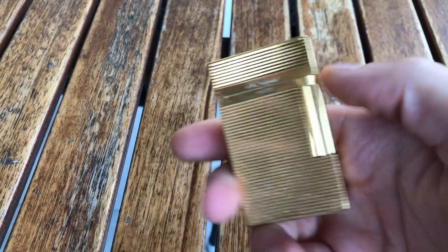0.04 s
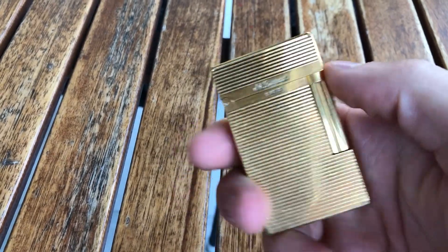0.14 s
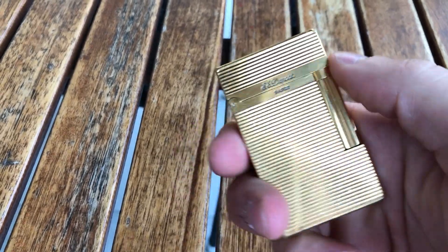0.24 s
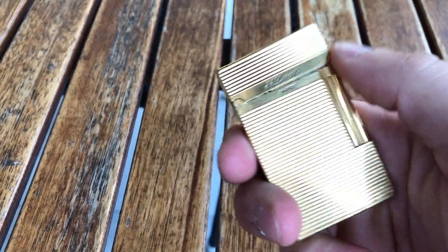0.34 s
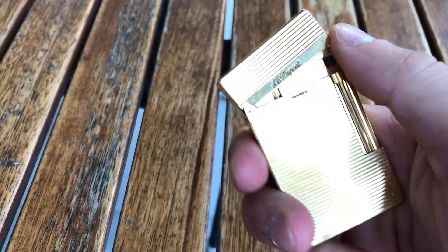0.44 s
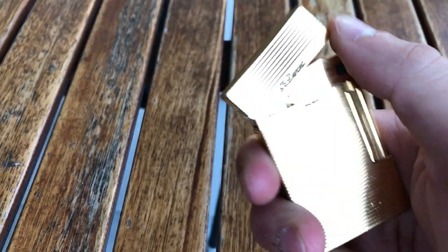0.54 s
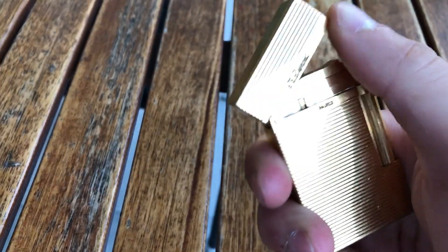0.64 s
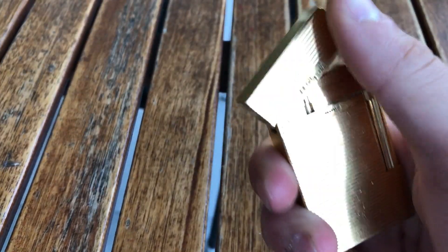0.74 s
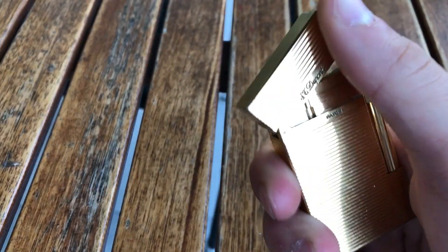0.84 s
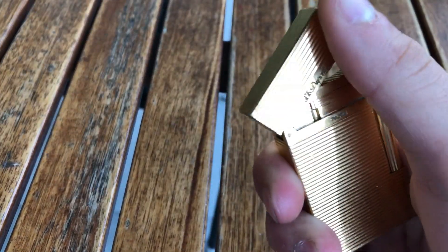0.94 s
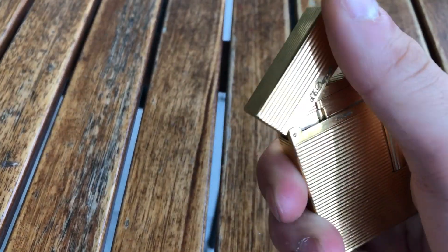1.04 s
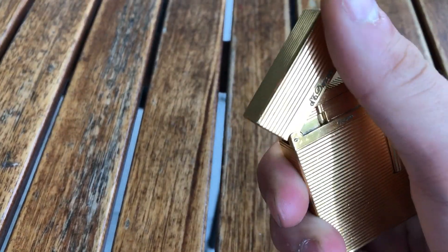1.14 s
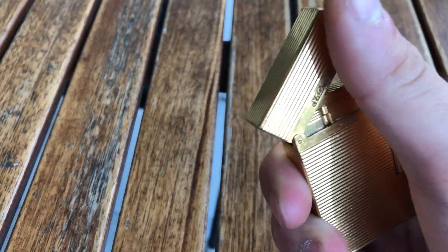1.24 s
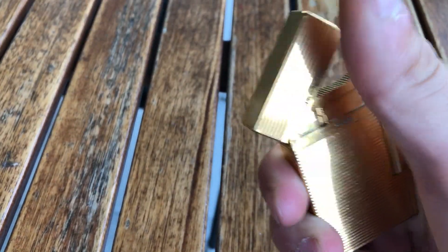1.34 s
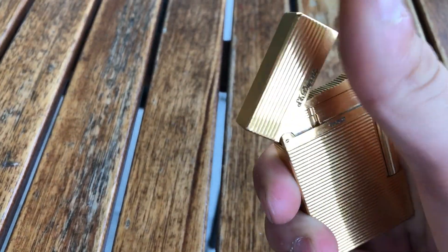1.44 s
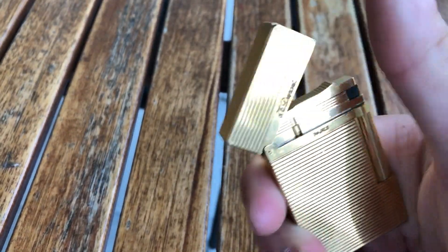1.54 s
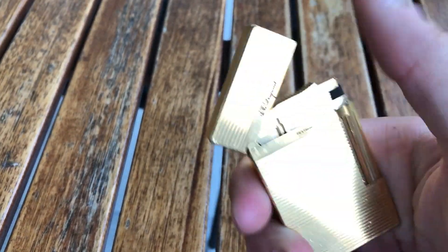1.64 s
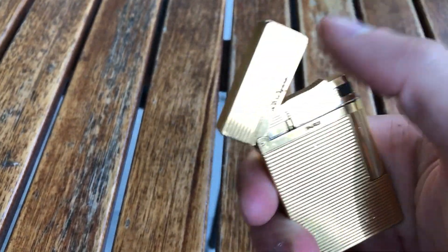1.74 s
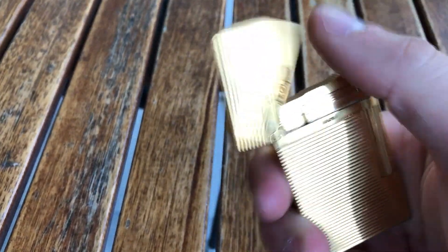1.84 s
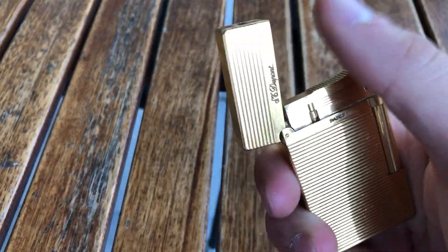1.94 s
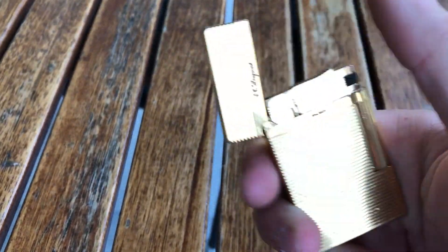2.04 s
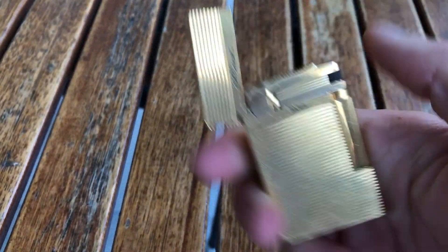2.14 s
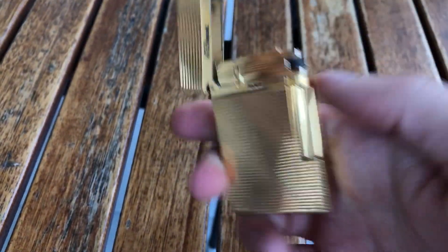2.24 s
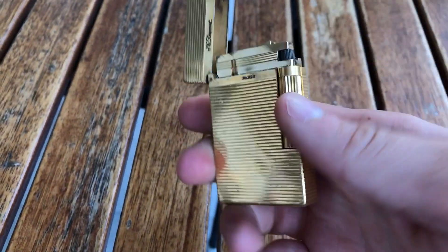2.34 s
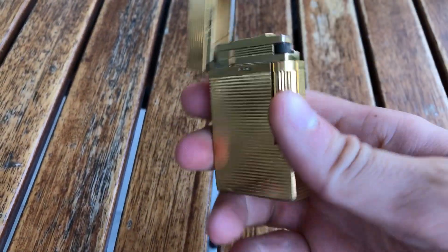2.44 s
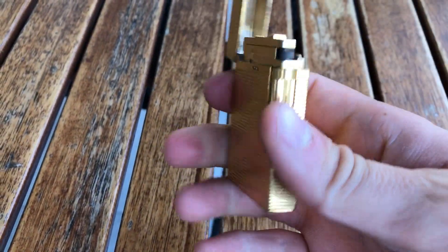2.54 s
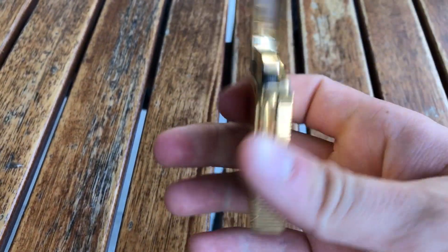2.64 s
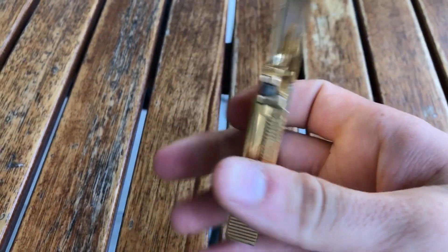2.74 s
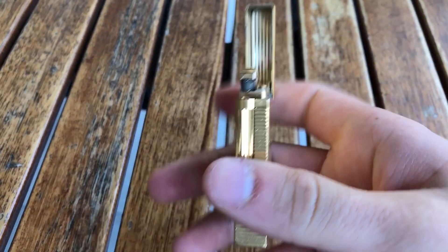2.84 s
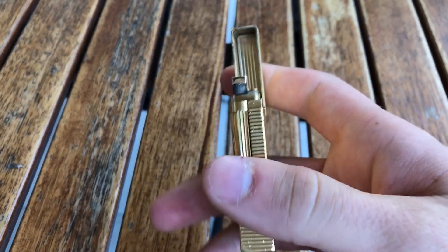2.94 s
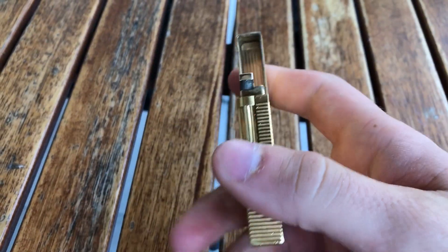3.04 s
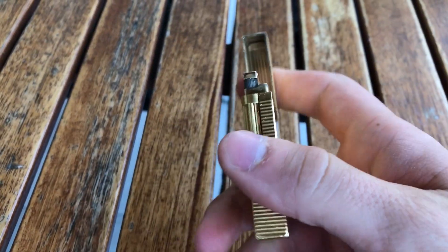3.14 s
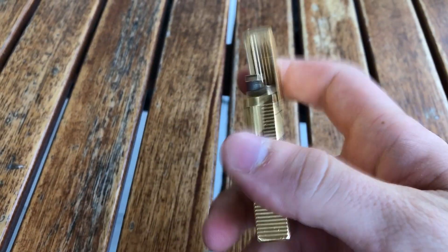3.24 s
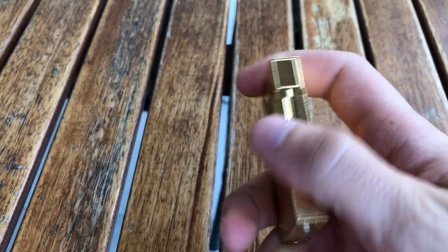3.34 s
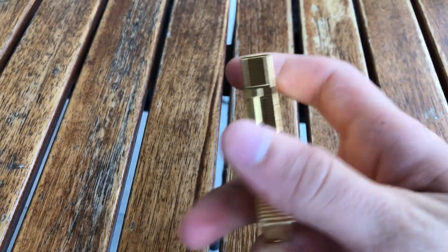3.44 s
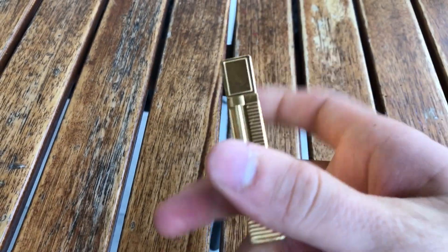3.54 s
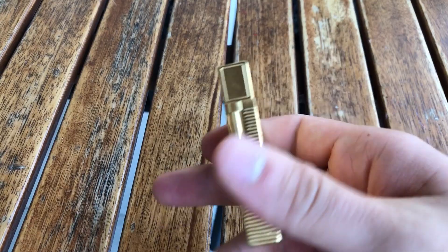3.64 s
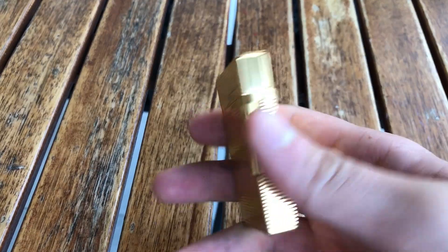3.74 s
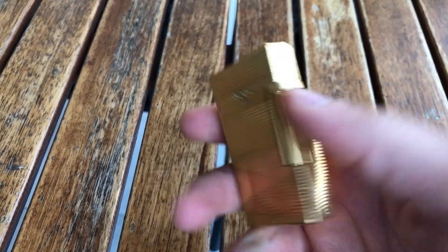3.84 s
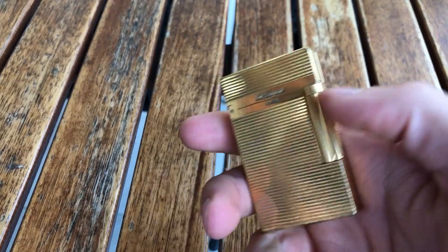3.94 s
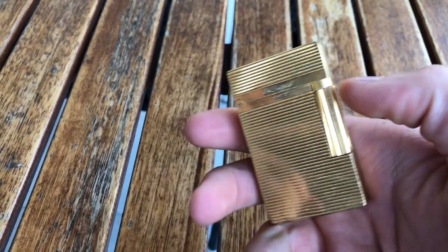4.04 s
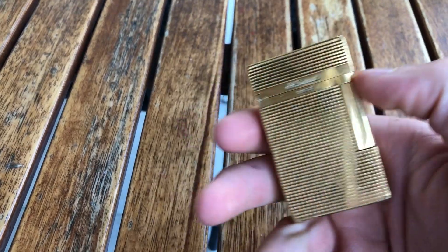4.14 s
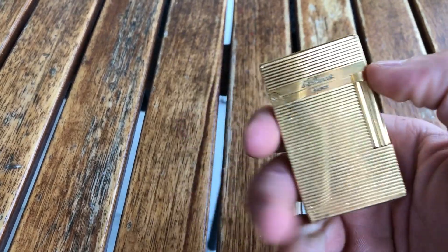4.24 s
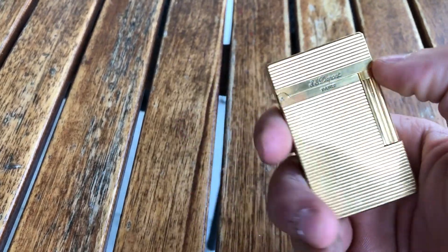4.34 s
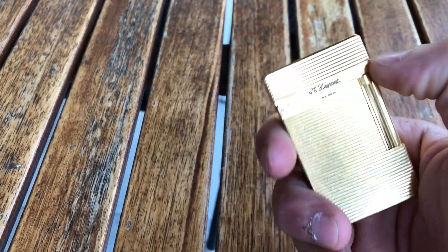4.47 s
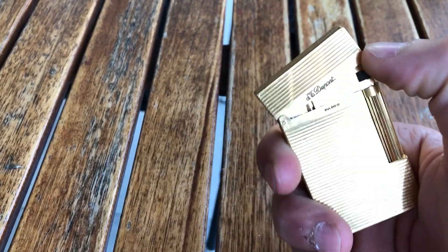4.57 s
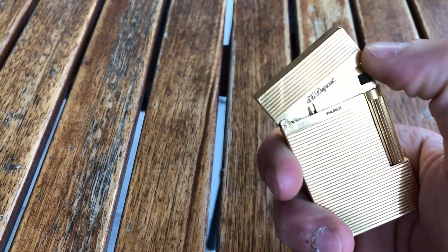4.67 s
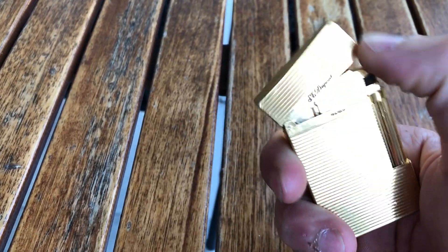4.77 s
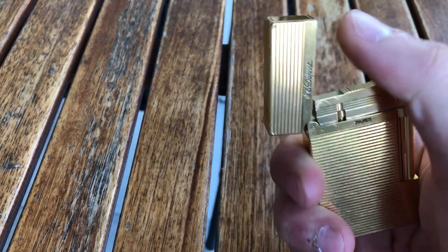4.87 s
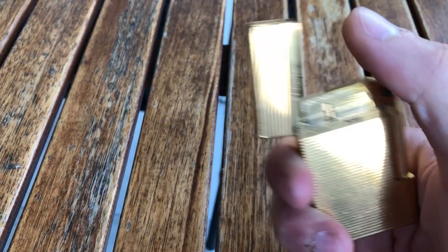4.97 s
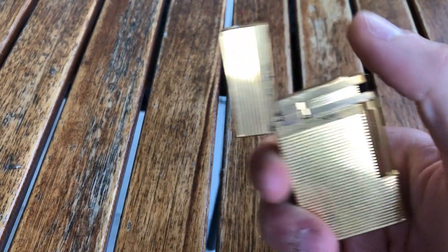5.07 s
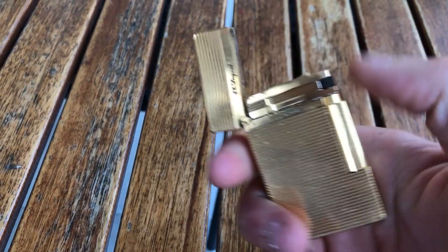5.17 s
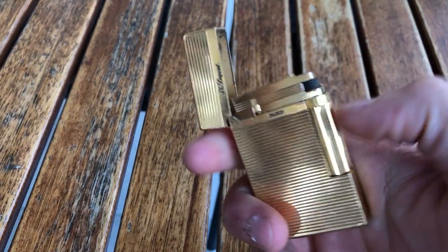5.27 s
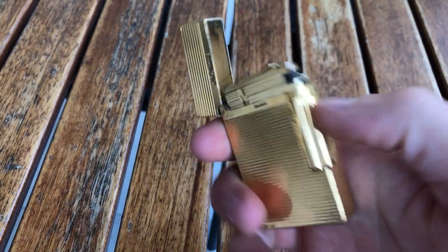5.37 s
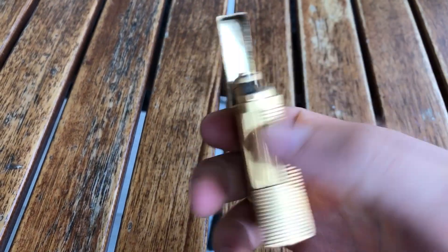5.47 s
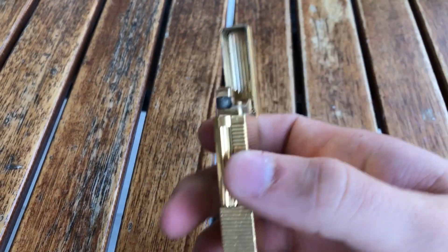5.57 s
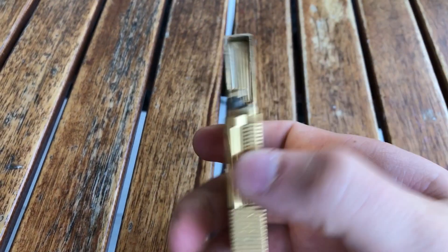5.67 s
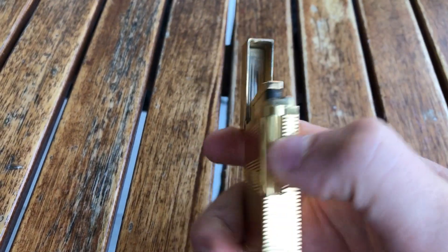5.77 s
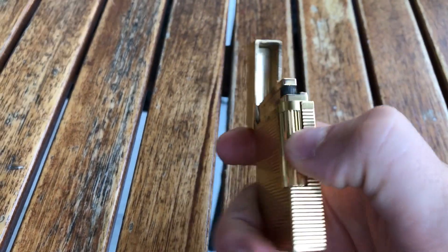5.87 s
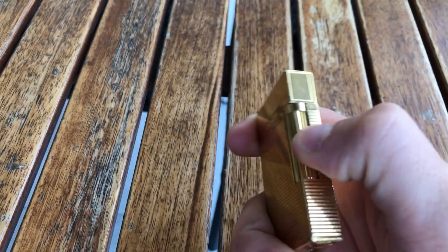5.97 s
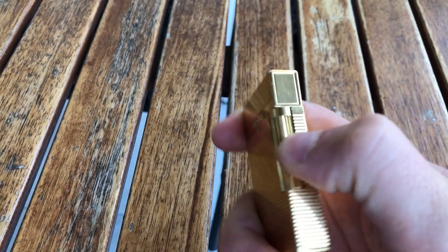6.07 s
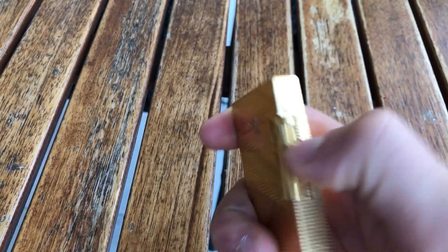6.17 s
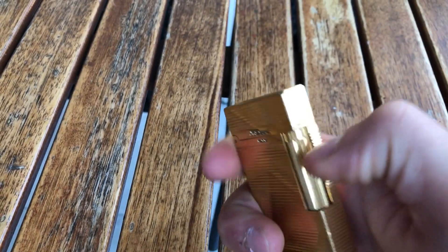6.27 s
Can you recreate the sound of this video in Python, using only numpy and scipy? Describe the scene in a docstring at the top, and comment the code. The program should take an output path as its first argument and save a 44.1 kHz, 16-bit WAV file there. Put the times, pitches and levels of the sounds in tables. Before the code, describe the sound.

Close metallic flicks: light thumb ticks, a bright high ping slowly fading, a hard crisp snap closed, repeated once, with distant traffic behind.

```python
"""Outdoors, near walls, far traffic humming: a brass pocket lighter handled close to a phone.
The thumb knocks and rubs the lid, the spring throws it open twice with a long ping (decaying sine modes plus
noise cracks), and each time it is snapped shut (grinding noise bursts, case modes, low puffs and thumps).
Walls answer with decaying noise echoes; traffic is slowly swelling coloured noise.
A limiter ducks everything when the treble is loud and creeps back."""
import sys
import numpy as np
from scipy import signal
from scipy.fft import rfft, irfft, next_fast_len
from scipy.io import wavfile
from scipy.ndimage import uniform_filter1d, minimum_filter1d, map_coordinates

SR = 44100
rng = np.random.default_rng(int(sys.argv[2]) if len(sys.argv) > 2 else 0)


def digitize_waveform(pressure):
    """Quantize a signal to 16-bit integers and store it at the path in sys.argv[1].

    Rows of a 2-D input are taken as channels; values are limited to [-1, 1].
    """
    field = np.atleast_2d(pressure).T
    bounded = np.clip(field, -1, 1)
    quanta = np.round(bounded * 32767).astype(np.int16)
    wavfile.write(sys.argv[1], SR, quanta)


N = 278271

# far traffic: (time [s], rumble level [dB], tyre rush level [dB])
TRAFFIC = [(0, -50, -58), (.7, -50, -59), (1.401, -50.5, -57), (1.999, -48, -59), (2.5, -50, -58.5),
           (2.9, -49, -55), (3.3, -51, -56), (3.8, -51, -59.5), (4.4, -48.5, -57), (5, -50, -62),
           (5.6, -49.5, -61), (6.31, -51, -59.5)]
# noise spectra, relative: (frequency [Hz], density [dB per Hz])
RUMBLE_SPECTRUM = [(12, -51.5), (20, -32.5), (45, -7), (65, 2.5), (103, -1), (252, 0), (290, -4.5),
                   (352, -8), (515, -19), (900, -34), (1170, -43), (1980, -120)]
TYRE_SPECTRUM = [(290, -30), (500, -3), (597, -2), (704, -1.5), (938, 1), (1540, -5), (1860, -3),
                 (2990, -14.5), (7000, -30.5), (9100, -55.5), (15400, -120)]
HISS_SPECTRUM = [(2350, -28), (4000, -7.5), (8320, -9.5), (15100, -14.5), (16000, -24), (16600, -51.5)]
# decay of the walls' answer: (frequency [Hz], t60 [s])
WALL_DECAY = [(300, .2), (2000, .3), (4000, .4), (6500, .34), (10000, .3), (16000, .24)]
# microphone response: (frequency [Hz], gain [dB])
MICROPHONE = [(25, -9.5), (45, 0), (15700, -0.5), (16100, -10.5), (16600, -23)]
TOP_HZ = 16700  # band limit

# skin sliding on ribbed metal: (start [s], length [s], peak of the rms envelope [dB])
RUBS = [(.01, 0.05, -65), (0.148, .0097, -72), (0.38, .097, -72), (2.179, 0.063, -83.5),
        (2.333, 0.051, -63.5), (2.879, .05, -80), (4.568, .063, -68), (5.434, 0.088, -74),
        (6.252, .01, -60.5)]
# skin noise spectrum, relative: (frequency [Hz], density [dB per Hz])
SKIN_SPECTRUM = [(2000, -34.5), (6000, -11.5), (10000, -7), (15000, -1), (17000, -15)]

# lid snaps onto case: (time [s], burst level [dB], contact [s], t60 [s],
# main (3820 Hz) case mode offset [dB], puff offset [dB])
SNAPS = [(3.3287, 2, 0.0011, 0.015, -3.5, -7), (6.0055, 3, 0.0021, 0.011, 8.5, -8)]
# snap noise spectrum, relative: (frequency [Hz], density [dB per Hz])
SNAP_SPECTRUM = [(300, -40), (900, -18.5), (1600, -16), (2600, -12), (4000, -8.5), (5000, -9.5),
                 (7000, -4.5), (10700, -6.5), (15000, -12.5), (17000, -9)]
# modes of the shut case, main mode first: (frequency [Hz], relative level [dB], t60 [s])
CASE_MODES = [(3820, 0, .012), (2550, -6, .008), (5880, -17, .07), (7500, -3, .01), (9300, -6, .008),
              (12750, 6, .009), (15100, 10, .009)]
SNAP_RISE_S, SNAP_RING_DB = 0.00032, -3.5
# air squeezed from under the closing lid: (delay after snap [s], relative level [dB], frequency [Hz], t60 [s])
PUFFS = [(-.009, -27, 310, .03), (.0006, 1, 502.4, .013)]
# jolt thumping in the hand: (time [s], level [dB], t60 [s])
THUMPS = [(3.340, -26.5, .1), (6.022, -9.5, 0.026)]
THUMP_HZ = 72
# cam touches: (lead before the snap [s], ...)
CAM_LEAD_S = (.0235, .0118, .0060)
# cam touches: (level relative to the snap [dB], ...)
CAM_REL_DB = (-41.5, -43, -33)
# cam touches: (length of contact [s], ...)
CAM_CONTACT_S = (.0035, 0.0029, .005)
CAM_RISE_S, CAM_T60_S, CAM_RING_DB = 0.00053, 0.0069, -1.5

# modes of the lid, plus a faint tone at three times the first mode's pitch: (frequency [Hz], relative level
# [dB], t60 swinging free [s])
LID_MODES = [(3677.5, 0, .55), (3880, -30, .15), (2850, -28, .03), (4813, -25, .06), (5885, -22, .05),
             (6480, -36, .1), (7428, -22, .085), (9140, -34, .1), (11040, -53, .2), (12800, -42, .04),
             (15150, -42, .06)]
# crack noise spectrum, relative: (frequency [Hz], density [dB per Hz])
CRACK_SPECTRUM = [(1000, -44.5), (2000, -18.5), (3000, -1.5), (4200, 0), (6000, -11), (9000, -7),
                  (13000, -15), (16000, -17)]
# thumb knocks on the held lid: (time [s], ring level [dB], crack level [dB], longest t60 under the thumb [s],
# ring tilt [dB per octave], crack tilt [dB per octave])
TICKS = [(.407, -52, -66, .08, 6, 6), (.438, -54.5, -59, 0.12, 0, 6), (.4425, -71, -52, .15, 55, 0),
         (.554, -60, -52, .05, 0, 12), (.567, -51, -45.5, 0.04, 21, -1.5), (0.772, -61.5, -74, .25, 2, 4),
         (1.375, -67, -78, 0.27, 6, 0), (4.555, -46, -68.5, .05, 1.5, 6.5), (4.606, -39.5, -51, .09, 9, 7),
         (4.615, -74, -40.5, .15, 40, -10), (4.757, -72, -59, .05, 0, 7), (4.874, -55, -60, 0.11, 28, 3)]
TICK_CRACK_T60_S = .014
# spring throws the lid against its stop: (time [s], ring level [dB], crack level [dB],
# longest t60 the grip allows [s], ring tilt [dB per octave])
FLICKS = [(1.9178, -5, -11, 2, 0.5), (4.9114, -2.5, -9.5, 0.5, -7.5)]
FLICK_CRACK_T60_S, FLICK_CRACK_TILT_DB_PER_OCT = 0.013, -2
# second, weaker contact after each throw: longer crack, upper modes favoured; levels and tilt add to the throw's
BOUNCE_DELAY_S, BOUNCE_CRACK_T60_S = .0074, 0.035
BOUNCE_RING_DB, BOUNCE_CRACK_DB, BOUNCE_TILT_DB_PER_OCT = -28, -15, 22
TILT_LIMIT_OCT = .68  # ring tilt stops growing this far above the first mode


def amp(db):
    """Gain of a level in dB."""
    return 10 ** (np.asarray(db) / 20)


def unit(x):
    """x at rms 1."""
    return x / np.sqrt(np.mean(x ** 2) + 1e-20)


def along(points, hz):
    """Interpolate (frequency [Hz], value) points on a log frequency axis."""
    point_hz, values = np.transpose(points)
    return np.interp(np.log(hz + 1), np.log(point_hz + 1), values)


def filtered(x, response):
    """x through a zero-phase response of frequency."""
    size = next_fast_len(len(x) + 8192)
    spectrum = rfft(x, size) * response(np.fft.rfftfreq(size, 1 / SR))
    return irfft(spectrum, size)[:len(x)]


def without_bass(x, corner_hz):
    """x with the bass rolled off below corner_hz."""
    return filtered(x, lambda hz: 1 / (1 + (corner_hz / (hz + 1)) ** 4))


def noise(spectrum, size):
    """Coloured noise of rms 1."""
    return unit(filtered(rng.standard_normal(size), lambda hz: amp(along(spectrum, hz))))


def wobble(rate_hz):
    """Smooth random curve, rate_hz knots a second."""
    knots = rng.standard_normal(int(N * rate_hz / SR) + 4)
    return map_coordinates(knots, [np.arange(N) * rate_hz / SR])


def add(track, time_s, sound):
    """Mix a sound into the track at time_s."""
    part = track[round(time_s * SR):][:len(sound)]
    part += sound[:len(part)]


def street():
    """Rumble and tyre rush, noise swelling slowly, under a thin steady hiss."""
    time_s, rumble_db, tyre_db = np.transpose(TRAFFIC)
    t = np.arange(N) / SR
    rumble_gain = amp(np.interp(t, time_s, rumble_db) + .8 * wobble(3.8))
    rumble = rumble_gain * noise(RUMBLE_SPECTRUM, size=N)
    tyre_gain = amp(np.interp(t, time_s, tyre_db) + .6 * wobble(2.5))
    tyres = tyre_gain * noise(TYRE_SPECTRUM, size=N)
    return rumble + tyres + amp(-78.5) * noise(HISS_SPECTRUM, size=N)


def walls(x, first_db, swell_db, gap_s=.0145, first_s=.0165):
    """After a gap, a dense first group of echoes, then a tail dying band by band."""
    hz, t, bands = signal.stft(rng.standard_normal(SR // 2), SR, nperseg=256)
    decay = amp(-60 * t / along(WALL_DECAY, hz)[:, None])
    tail = signal.istft(bands * decay, SR, nperseg=256)[1]
    u = np.arange(len(tail)) / SR
    # the first group's boost ramps by swell_db, then fades out around first_s
    ramp_db = first_db + swell_db * (u / first_s - 1)
    group_db = ramp_db / (1 + np.exp(np.clip((u - first_s) / .0015, -50, 50)))
    tail = tail * amp(group_db) * (1 - np.exp(-u / 0.0015))
    tail = np.pad(tail / np.linalg.norm(tail), (round(gap_s * SR), 0))  # unit energy
    return signal.fftconvolve(x, tail)[:N]


def rubs():
    """Thin grainy hiss while skin slips over the ribs."""
    shape = np.zeros(N)
    for time_s, length_s, db in RUBS:
        add(shape, time_s, amp(db) * np.hanning(round(length_s * SR)) ** .5)
    grain = amp(2.6 * wobble(100))
    return shape * unit(grain * noise(SKIN_SPECTRUM, size=N))


def puffs():
    """Decaying low sines: air pushed out at each snap, and thumps in the hand."""
    out, t = np.zeros(N), np.arange(8192) / SR
    pushes = []
    for snap_s, *_, puff_db in SNAPS:
        pushes += [(snap_s + delay_s, puff_db + db, hz, t60_s) for delay_s, db, hz, t60_s in PUFFS]
    pushes += [(time_s, db, THUMP_HZ, t60_s) for time_s, db, t60_s in THUMPS]
    for time_s, db, hz, t60_s in pushes:
        add(out, time_s, amp(db - 60 * t / t60_s) * np.sin(2 * np.pi * hz * t))
    return out


def contacts():
    """Cam touches, then the snap: (time, level, rise, contact, t60, ring dB, main mode dB)."""
    rows = []
    for time_s, db, contact_s, t60_s, main_db, _ in SNAPS:
        for lead_s, rel_db, touch_s in zip(CAM_LEAD_S, CAM_REL_DB, CAM_CONTACT_S):
            rows.append((time_s - lead_s, db + rel_db, CAM_RISE_S, touch_s, CAM_T60_S, CAM_RING_DB, main_db))
        rows.append((time_s, db, SNAP_RISE_S, contact_s, t60_s, SNAP_RING_DB, main_db))
    return rows


def shutting():
    """Each contact is a burst of bright grinding noise that also rings the shut case.
    Summed over all directions, as the walls receive it, a burst is one smooth pulse of the same energy."""
    bursts, ring, pulses = np.zeros(N), np.zeros(N), np.zeros(N)
    t = np.arange(4096) / SR
    impulse = np.eye(1, 4096, 64)[0]
    pulse = filtered(impulse, lambda hz: amp(along(SNAP_SPECTRUM, hz)))
    for time_s, db, rise_s, contact_s, t60_s, ring_db, main_db in contacts():
        start = amp(db) * (1 - np.exp(-t / rise_s))
        after_s = np.maximum(t - contact_s, 0)
        shape = start * amp(-60 * after_s / t60_s)  # holds during contact, then decays
        add(bursts, time_s, shape * noise(SNAP_SPECTRUM, size=4096))
        add(pulses, time_s, pulse * np.linalg.norm(shape) / np.linalg.norm(pulse))
        for k, (hz, mode_db, mode_t60_s) in enumerate(CASE_MODES):
            level_db = mode_db + ring_db + rng.normal(0, 1.7) + (main_db if k == 0 else 0)
            tone = np.sin(2 * np.pi * (hz * t + rng.random()))
            add(ring, time_s, start * amp(level_db - 60 * t / mode_t60_s) * tone)
    return bursts, ring, pulses


def blows():
    """Blows on the lid: (time, ring dB, crack dB, crack t60, grip t60, ring tilt, crack tilt)."""
    rows = [(time_s, ring_db, crack_db, TICK_CRACK_T60_S, *rest) for time_s, ring_db, crack_db, *rest in TICKS]
    for time_s, ring_db, crack_db, grip_s, tilt in FLICKS:
        rows.append((time_s, ring_db, crack_db, FLICK_CRACK_T60_S, grip_s, tilt, FLICK_CRACK_TILT_DB_PER_OCT))
        rows.append((time_s + BOUNCE_DELAY_S, ring_db + BOUNCE_RING_DB, crack_db + BOUNCE_CRACK_DB,
                     BOUNCE_CRACK_T60_S, grip_s, tilt + BOUNCE_TILT_DB_PER_OCT, FLICK_CRACK_TILT_DB_PER_OCT))
    return rows


def lid(rebound_s=.0115, turn_s=.0045, dip_db=-3):
    """Each blow rings the lid's modes and cracks; a gripping thumb shortens the ring."""
    ring, cracks = np.zeros(N), np.zeros(N)
    t = np.arange(SR) / SR
    short = t[:2048]
    # fast build-up, then a dip while the lid rebounds from its stop
    dip = amp(dip_db * np.exp(-((t - rebound_s) / turn_s) ** 2))
    swing = (1 - np.exp(-t / .0004)) * dip
    for time_s, ring_db, crack_db, crack_t60_s, grip_s, ring_tilt, crack_tilt in blows():
        for hz, mode_db, t60_s in LID_MODES:
            octaves = min(np.log2(hz / LID_MODES[0][0]), TILT_LIMIT_OCT)
            level_db = ring_db + mode_db + ring_tilt * octaves
            decay = amp(level_db - 60 * t / min(t60_s, grip_s))
            add(ring, time_s, swing * decay * np.sin(2 * np.pi * hz * t))
        shape = amp(crack_db - 60 * short / crack_t60_s) * (1 - np.exp(-short / 0.00036))
        tilted = [(hz, db + crack_tilt * np.log2(hz / 4000)) for hz, db in CRACK_SPECTRUM]
        add(cracks, time_s, shape * noise(tilted, size=2048))
    # so small a lid radiates little bass
    return without_bass(ring, 1800), without_bass(cracks, 1800)


def scene():
    """The lighter close by, its echoes, and the street."""
    ring, cracks = lid()
    bursts, case, pulses = shutting()
    sent = without_bass(pulses + amp(2.0) * case, 2200)
    early = np.arange(N) < N * 3 // 4  # the hand moves, so the two snaps meet different echoes
    echoes = amp(-11.5) * walls(sent * early, first_db=12.0, swell_db=8)
    echoes += amp(-12.5) * walls(sent * ~early, first_db=7, swell_db=2.0)
    echoes += walls(amp(-24) * cracks + amp(-27.5) * ring, first_db=6.5, swell_db=-2.8)
    return (ring + cracks + bursts + case + puffs() + rubs() + echoes + street())[None]


def limiter(x, sense_hz=6000, ceiling_db=-17, stages=((.03, .15), (.5, .4), (5, .45))):
    """Treble over the ceiling turns the whole sound down just ahead of time.
    The gain returns in stages: (time constant [s], share)."""
    treble = filtered(x, lambda hz: hz > sense_hz)
    level_db = 10 * np.log10(np.abs(uniform_filter1d(treble ** 2, size=64)) + 1e-12)
    log_excess = np.log(np.maximum(level_db - ceiling_db, 1e-3))
    wanted = -minimum_filter1d(-log_excess, size=33)  # moving maximum looks ahead
    t = np.arange(N) / SR
    cut_db = np.zeros(N)
    for tau_s, share in stages:
        # peak hold whose cut in dB decays exponentially
        cut_db += share * np.exp(np.maximum.accumulate(wanted + t / tau_s) - t / tau_s)
    cut_db = cut_db / sum(share for _, share in stages)
    return x * amp(-uniform_filter1d(cut_db, size=17))


def record(dry):
    """Limiter, the microphone's response, then the band limit."""
    limited = limiter(dry[0])
    return filtered(limited, lambda hz: amp(along(MICROPHONE, hz)) * (hz < TOP_HZ))[None]


dry = scene()
out = record(dry)
digitize_waveform(out)
```